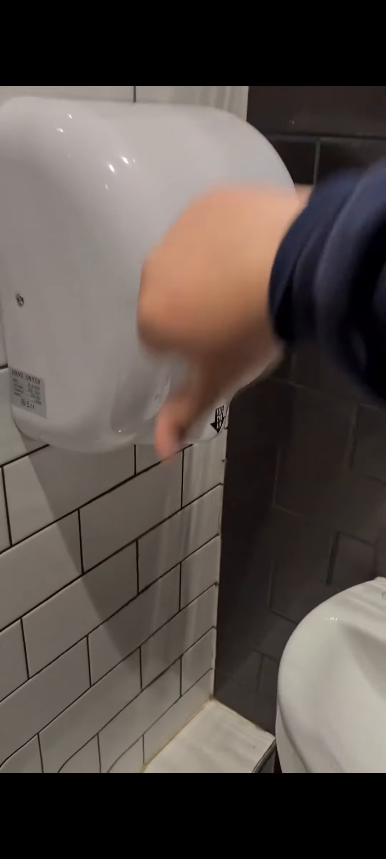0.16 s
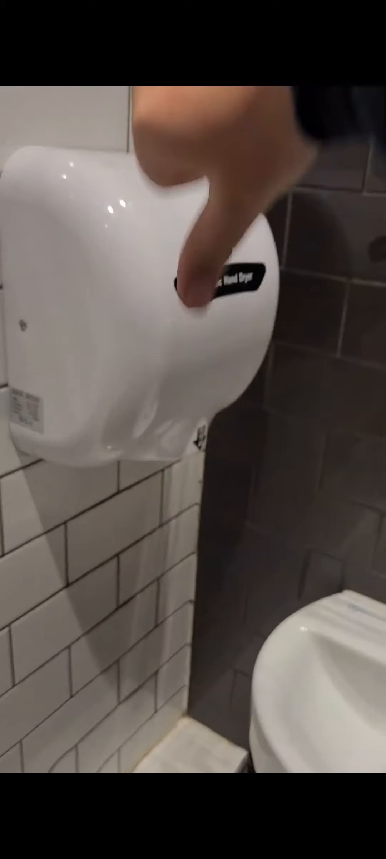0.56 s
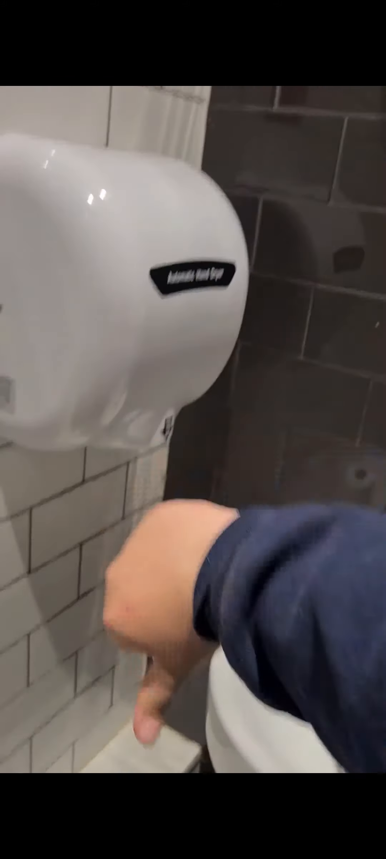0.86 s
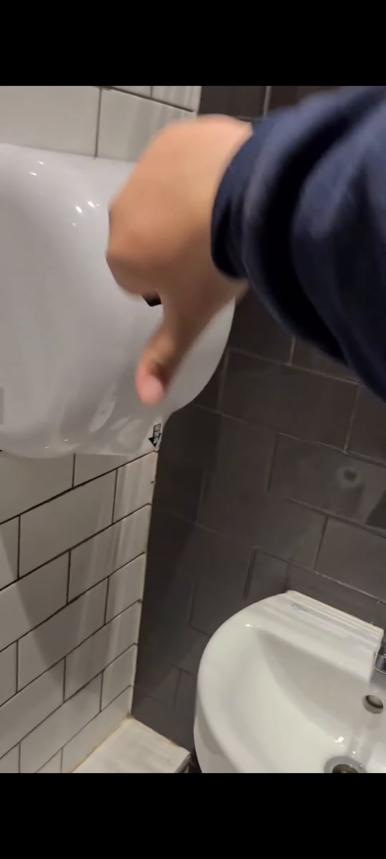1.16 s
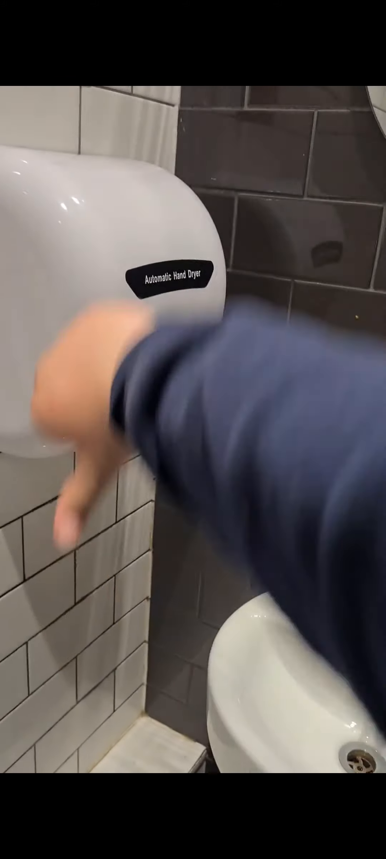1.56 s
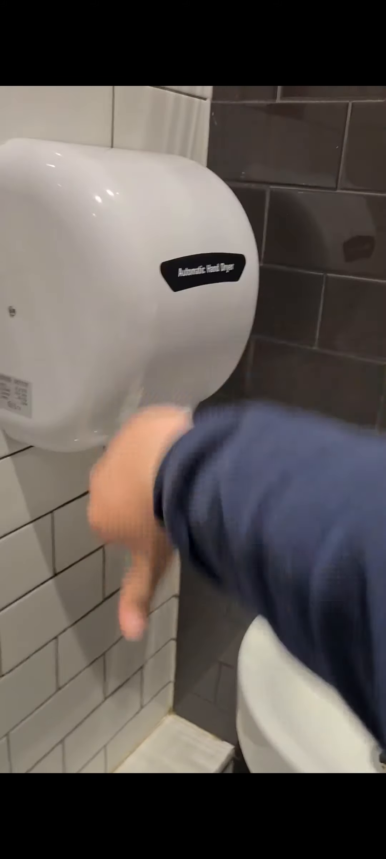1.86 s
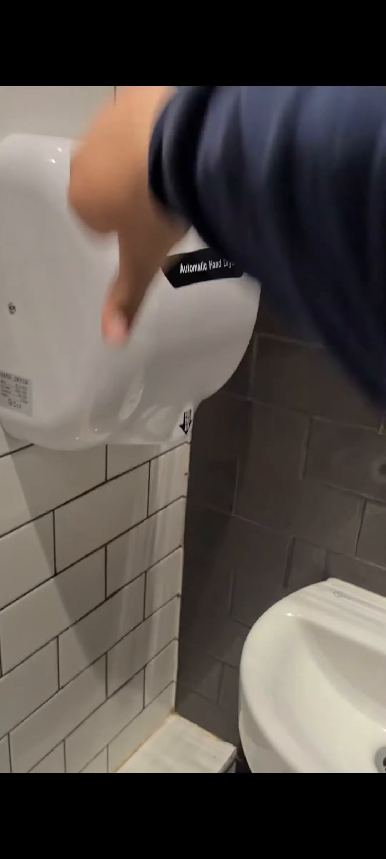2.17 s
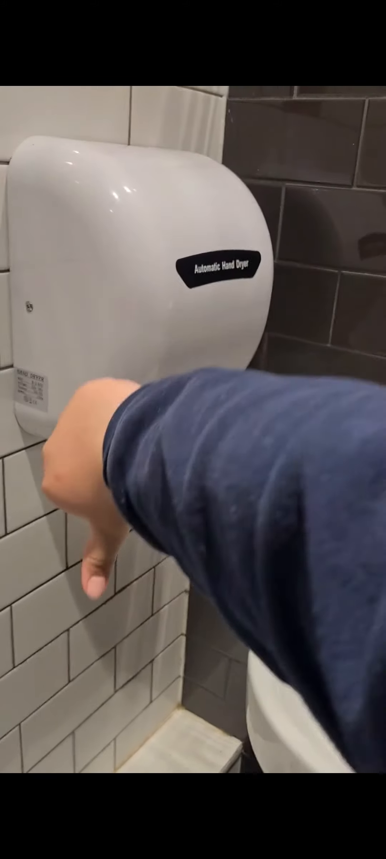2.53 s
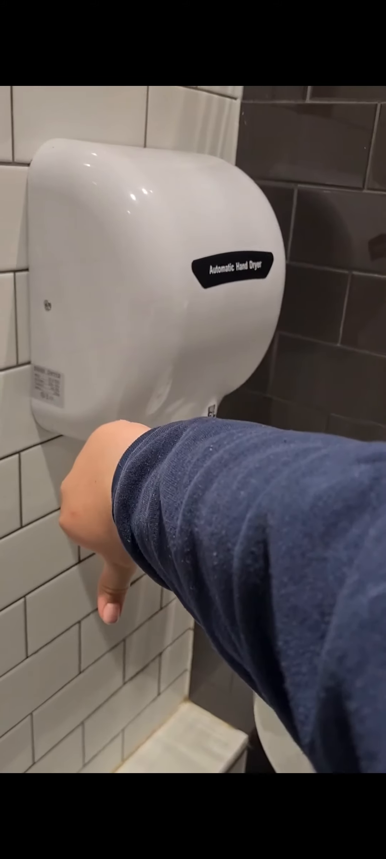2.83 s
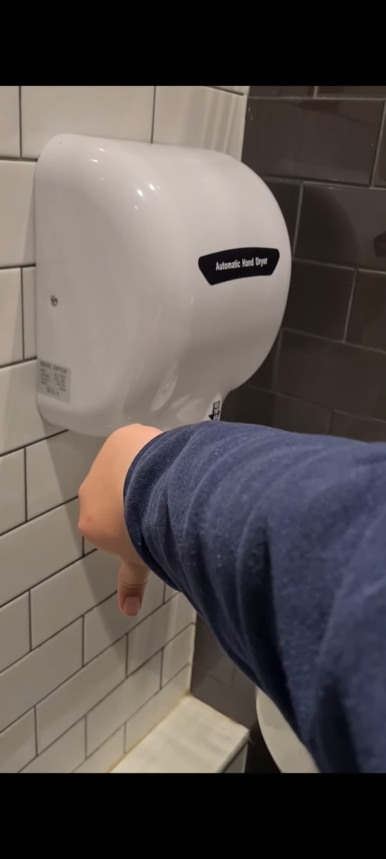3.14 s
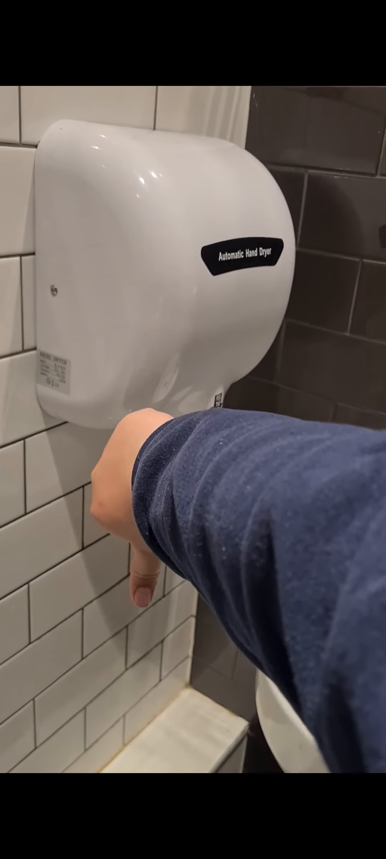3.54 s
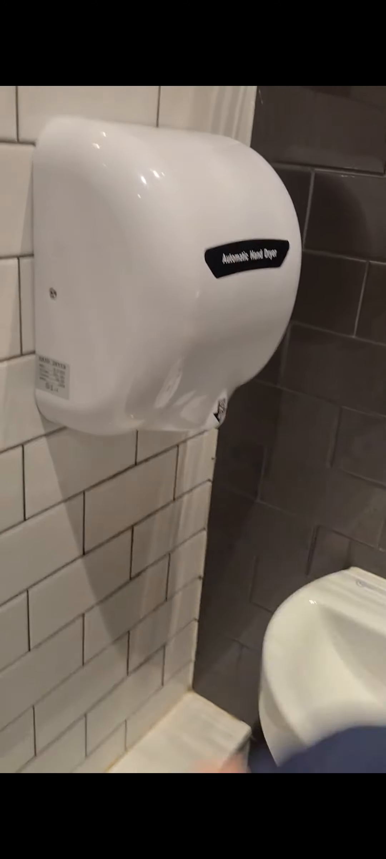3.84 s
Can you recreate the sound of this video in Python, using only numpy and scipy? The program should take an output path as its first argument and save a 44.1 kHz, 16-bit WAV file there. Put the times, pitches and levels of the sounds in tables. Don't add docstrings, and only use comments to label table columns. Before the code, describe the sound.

Close stereo pickup of a restroom hand dryer: roaring air rises briefly to full speed, power cuts, the whining hum slides steadily lower as air fades to room ventilation, then a soft drip and sharp tick.

```python
import sys
import numpy as np
from scipy import signal
from scipy.fft import rfft, irfft, next_fast_len
from scipy.io import wavfile
from scipy.ndimage import uniform_filter1d, map_coordinates

SR = 44100
rng = np.random.default_rng(int(sys.argv[2]) if len(sys.argv) > 2 else 0)


def boost_factor(decibels):
    exponent = np.asarray(decibels, float) / 20
    return 10 ** exponent


def to_wav(s):
    ch = np.atleast_2d(s).T
    pcm = np.round(np.clip(ch, -1, 1) * 32767)
    wavfile.write(sys.argv[1], SR, pcm.astype(np.int16))


N = 176400

# time_s, turns_hz
ROTOR_SPEED = [(0, 344.4), (.12, 365.9), (.25, 373), (.5, 383.5), (.78, 388), (.87, 363.6), (1, 338),
               (1.15, 308.3), (1.3, 275.1), (1.5, 247), (1.75, 215.1), (2, 194), (2.25, 166.3),
               (2.5, 151.5), (2.75, 133), (3, 119.8), (3.4, 98.2), (4, 70.45)]
FULL_HZ, OFF_S = 388, 0.73

# pitch_hz, width_hz, level_db, left_minus_right_db
WALL_MODES = [(147, 6, -11, -1), (159, 8, -12, -2), (176, 5, -3, -1), (193, 5, -7, 0), (207, 4, -11, -2),
              (224, 5, 3, -1), (241, 9, 2, -1), (254, 8, 2, -1), (274, 7, 6, -2), (299, 9, 4, -2),
              (320, 10, 1, -1), (348, 7, 6, -1), (371, 5, 5, -2), (385, 6, 1, -2)]
# pitch_hz, width_hz, level_db, left_minus_right_db
OUTLET_MODES = [(177.4, 14, -4, -5), (236, 10.4, -8.5, 2.5), (247, 24, -5.5, -1), (272.6, 4.3, 1.5, 6),
                (302.4, 25, 0.5, -1.5), (338, 3.9, 7, -6), (373, 3, 16, -2), (401, 3.3, 11, -6),
                (421, 8.3, 14.5, 0.5), (455, 41, 11.5, 0.5), (495.5, 10.9, 7, -12), (561, 12, 0.5, 14),
                (577.7, 6.8, 8.5, -15), (615.5, 12, 6, -8)]
OUTLET_TOP_HZ = 534

UNBALANCE_DB, UNBALANCE_FALL_DB, MOUNT_HZ = -28.5, 1, 143.4
# multiple_of_speed, level_db at full speed, fall_db per halving
ARMATURE_TONES = [(2, -34, 6), (2.64, -43.5, 7), (3.42, -46.5, 7.5), (4.4, -57, 3)]

BLADES, BLADE_DB, BLADE_FALL_DB, BLADE_BLUR_HZ = 9, -40, 6, 200
SEGMENTS, WHINE_FALL_DB, WHINE_BLUR_HZ, WHINE_STEADY = 22, 2, 90, 0
# multiple_of_segment_rate, level_db
WHINE_ORDERS = [(1, -52), (2, -56), (3, -59), (4, -72), (6, -73), (7, -74)]
# pitch_hz, width_hz, level_db
CASING_BANDS = [(1880, 150, -2), (2090, 190, 1), (3060, 160, -1), (4270, 280, 2), (4680, 180, -3),
                (5330, 260, 0), (6300, 250, 1), (6900, 240, 0), (14700, 1700, 3)]
HUM_HZ, HUM_DB = 100, -42.5

# time_s, strength_db
AIR_FLOW = [
    (0.0, -33),
    (0.11, -31.5),
    (0.75, -27.5),
    (2.7, -48),
    (3.0, -53.5),
    (3.36, -57),
    (3.71, -62.5),
    (4.0, -66),
]
# pitch_hz, width_hz, level_db over the rush
HOUSING_MODES = [(839.6, 33, 13.5), (1121, 98, 11.5), (1319, 84, 12), (1835, 300, 7.5), (2102, 96, 8),
                 (3043.6, 93, 4.5), (3507, 230, -0.5), (4300, 37, 4), (4530, 90, 2), (5515, 57, 3.5),
                 (6394, 50, -0.5), (6700, 75, -0.5), (7800, 35, -4), (14600, 1800, -27.5)]
# pitch_hz, density_db per Hz
ROAR_SPECTRUM = [(25, -0.5), (50, 6), (100, 4), (200, 6.5), (420, -1), (650, 5), (900, -0.5), (1500, -85)]
# pitch_hz, density_db per Hz
RUSH_SPECTRUM = [(500, -31), (900, -7.5), (1600, -5.5), (2600, -3), (5000, -1), (7200, -2), (8200, -13),
                 (11000, -28)]
# pitch_hz, density_db per Hz
BRUSH_SPECTRUM = [(500, -57.5), (850, 0), (1350, -4), (2000, 1.5), (3050, 5), (4500, 7), (7000, -10),
                  (8500, -27)]
# pitch_hz, density_db per Hz
HISS_SPECTRUM = [(6000, -11), (8000, 0), (9500, 3.5), (11500, -0.5), (13000, 0), (15000, -2.5), (16000, -3)]
ROAR_DB, ROAR_GROWS, RUSH_DB = -2.5, 0.54, -1
BRUSH_DB, BRUSH_GROWS, HISS_DB, HISS_GROWS = -6, 0.7, 0.5, 1.43
ROAR_IN_MODES = 0.86

# pitch_hz, density_db per Hz
VENT_SPECTRUM = [(25, -1.5), (70, 10.5), (110, -3), (170, 3.5), (420, -14), (800, -2.5), (1300, -26.5),
                 (16000, -33)]
VENT_DB = -50
# pitch_hz, likeness
LIKENESS = [(30, .96), (70, 0.79), (180, 0.97), (420, 0.44), (700, 0), (1400, 0.0059), (15000, 0.037)]
# pitch_hz, left_minus_right_db
STEREO_LEAN = [(30, 3), (70, 1.5), (200, -0.5), (500, 0), (1300, -0.9), (4400, -5.5), (8100, -2.5),
               (14000, -6.5)]

DRIP_S, DRIP_DB, DRIP_HZ, DRIP_T60_S = 3.366, -32, 620, 0.018
TICK_S, TICK_DB, TICK_LEAN_DB, TICK_ROOM_DB = 3.8515, -22, -5, 8
# delay_s, level_db
TICK_CONTACTS = [
    (.0006, -7),
    (.001, 12),
    (.0013, -13),
]
# pitch_hz, level_db
TICK_COLOUR = [(1500, -43), (3200, -6), (4500, -2), (6500, 4.5), (8500, 1), (10000, -2), (13000, -6),
               (16000, -18.5)]
# pitch_hz, t60_s
TILE_DECAY = [(2000, .35), (6000, 0.214), (14000, 0.26)]

# pitch_hz, level_db
MIC_DIP = [(7300, 0), (8200, -6), (9300, -8), (10900, -5), (12000, 0)]
TOP_HZ = 15870


def unit(x):
    return x / np.sqrt(np.mean(x ** 2) + 1e-20)


def along(points, hz):
    f, v = np.transpose(points)
    return np.interp(np.log(hz + 1), np.log(f + 1), v)


def curve(rows):
    return np.interp(np.arange(N) / SR, *np.transpose(rows))


def wobble(rate):
    knots = rng.standard_normal(int(N * rate / SR) + 4)
    return map_coordinates(knots, [np.arange(N) * rate / SR])


def filtered(x, response):
    m = next_fast_len(x.shape[-1] + SR // 2)
    spectrum = rfft(x, m) * response(np.fft.rfftfreq(m, 1 / SR))
    return irfft(spectrum, m)[..., :x.shape[-1]]


def peak(f, hz, width):
    return 1j * f * width / (hz * hz - f * f + 1j * f * width)


def standing(f, modes, count=1):
    total = 0
    for hz, width, db, lean in modes:
        sides_db = np.array([[db + lean / 2], [db - lean / 2]])
        total = total + boost_factor(sides_db / count) * peak(f, hz, width)
    return total ** count


def housing(f, flat=1):
    humps = sum(np.abs(boost_factor(db) * peak(f, hz, width)) ** 2 for hz, width, db in HOUSING_MODES)
    return np.sqrt(flat + humps)


def casing(f):
    return sum(boost_factor(db) * np.abs(peak(f, hz, width)) ** 2 for hz, width, db in CASING_BANDS)


def noise(spectrum, patchy_db):
    z = signal.stft(rng.standard_normal((2, N)), nperseg=512)[2]
    field = uniform_filter1d(rng.standard_normal(z.shape[1:]), size=6, axis=0)
    field = uniform_filter1d(field, size=14, axis=1)
    pair = signal.istft(z * boost_factor(patchy_db * unit(field)), nperseg=512)[1][:, :N]

    def mid_side_gain(hz):
        angle = np.arccos(np.clip(along(LIKENESS, hz), -1, 1)) / 2
        return boost_factor(along(spectrum, hz)) * [np.cos(angle), np.sin(angle)]

    mid, side = filtered(pair, mid_side_gain)
    return unit(np.array([mid + side, mid - side]))


def fuzzy(turns, blur_hz, steady):
    phase = 2 * np.pi * turns
    return np.array([(steady + wobble(blur_hz)) * np.sin(phase) + wobble(blur_hz) * np.cos(phase)
                     for _ in range(2)])


def rotor():
    speed = curve(ROTOR_SPEED)
    return speed, np.cumsum(speed) / SR, np.log2(FULL_HZ / speed)


def rotor_tones():
    speed, turns, halvings = rotor()
    lead = np.arange(-SR // 4, 0) * speed[0] / SR
    all_turns = np.r_[lead, turns]
    all_halvings = np.pad(halvings, (len(lead), 0), "edge")

    def tone(multiple, db, fall_db):
        return boost_factor(db - fall_db * all_halvings) * np.sin(2 * np.pi * multiple * all_turns)

    def wall_path(f):
        return standing(f, WALL_MODES) / (1 + (MOUNT_HZ / (f + 1)) ** 20)

    def outlet_path(f):
        return standing(f, OUTLET_MODES, count=2) / (1 + (f / OUTLET_TOP_HZ) ** 6)

    wall = filtered(tone(1, UNBALANCE_DB, UNBALANCE_FALL_DB), wall_path)
    outlet = filtered(sum(tone(*row) for row in ARMATURE_TONES), outlet_path)
    return np.sqrt(2) * (wall + outlet)[:, len(lead):]


def mains_hum():
    t = np.arange(N) / SR
    powered = 1 / (1 + np.exp((t - OFF_S) / 0.099))
    return boost_factor(HUM_DB + 2.2 * wobble(6)) * np.sin(2 * np.pi * HUM_HZ * t) * powered


def blade_tone():
    _, turns, halvings = rotor()
    flow_db = curve(AIR_FLOW)
    level_db = BLADE_DB - BLADE_FALL_DB * halvings + 0.92 * (flow_db - flow_db.max())
    return filtered(boost_factor(level_db) * fuzzy(BLADES * turns, BLADE_BLUR_HZ, 0), housing)


def commutator_whine():
    speed, turns, halvings = rotor()
    whine = 0
    for k, db in WHINE_ORDERS:
        order = k * SEGMENTS
        audible = order * speed < SR / 2.2
        beating = fuzzy(order * turns, WHINE_BLUR_HZ * k, WHINE_STEADY)
        whine = whine + audible * boost_factor(db - WHINE_FALL_DB * halvings) * beating
    return filtered(whine, casing)


def air():
    flow_db = curve(AIR_FLOW)
    top_db = flow_db.max()
    drop_db = flow_db - top_db + 0.5 * wobble(2.3)
    direct = noise(ROAR_SPECTRUM, patchy_db=0.5)
    resonant = unit(filtered(direct, lambda f: standing(f, OUTLET_MODES)))
    roar = unit(np.sqrt(1 - ROAR_IN_MODES) * direct + np.sqrt(ROAR_IN_MODES) * resonant)
    rush = unit(filtered(noise(RUSH_SPECTRUM, patchy_db=0.47), housing))
    brush = noise(BRUSH_SPECTRUM, patchy_db=3.2)
    brush = unit(filtered(brush, lambda f: housing(f, flat=0.03) ** 1.59))
    hiss = noise(HISS_SPECTRUM, patchy_db=1.7)
    mix = boost_factor(ROAR_DB + ROAR_GROWS * drop_db) * roar
    mix = mix + boost_factor(RUSH_DB + drop_db) * rush
    mix = mix + boost_factor(BRUSH_DB + BRUSH_GROWS * drop_db) * brush
    mix = mix + boost_factor(HISS_DB + HISS_GROWS * drop_db) * hiss
    return boost_factor(top_db) * mix


def ventilation():
    return boost_factor(VENT_DB) * noise(VENT_SPECTRUM, patchy_db=2.92)


def placed(sound, start_s):
    out = np.zeros((2, N + SR))
    start = round(start_s * SR)
    out[:, start:start + sound.shape[-1]] += sound
    return out[:, :N]


def drip():
    t = np.arange(SR // 2) / SR
    onset = 1 - np.exp(-t / 0.0009)
    ring = boost_factor(DRIP_DB - 60 * t / DRIP_T60_S) * np.sin(2 * np.pi * DRIP_HZ * t) * onset
    return placed(ring, DRIP_S)


def tick():
    length = SR // 2
    contacts = np.zeros(length)
    for s, db in TICK_CONTACTS:
        contacts[round(s * SR)] += boost_factor(db)
    crack = filtered(contacts, lambda f: boost_factor(along(TICK_COLOUR, f)))
    crack = crack / np.abs(crack).max()
    hz, times, z = signal.stft(rng.standard_normal((2, length)), SR, nperseg=256)
    decay = boost_factor(-60 * times / along(TILE_DECAY, hz)[:, None])
    tail = signal.istft(z * decay, SR, nperseg=256)[1][:, :length]
    tail = tail / np.linalg.norm(tail[0])
    delayed = np.pad(crack, (90, 0))[None]
    wet = signal.fftconvolve(delayed, tail, axes=1)[:, :length]
    direct = boost_factor([[TICK_LEAN_DB], [0]]) * crack
    return placed(boost_factor(TICK_DB) * (direct + boost_factor(TICK_ROOM_DB) * wet), TICK_S)


def scene():
    low = rotor_tones() + mains_hum()
    wide = blade_tone() + commutator_whine() + air() + ventilation()
    wide = filtered(wide, lambda f: boost_factor(along(STEREO_LEAN, f) * [[0.5], [-0.5]]))
    return low + wide + drip() + tick()


def roll_off(x):
    return signal.sosfilt(signal.butter(12, 16220, fs=SR, output="sos"), x)


def record(dry):
    finished = filtered(dry, lambda hz: boost_factor(along(MIC_DIP, hz)) * (hz < TOP_HZ))
    return roll_off(finished)


dry = scene()
out = record(dry)
to_wav(out)
```